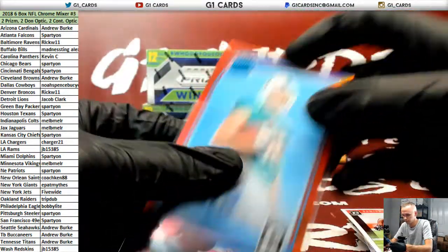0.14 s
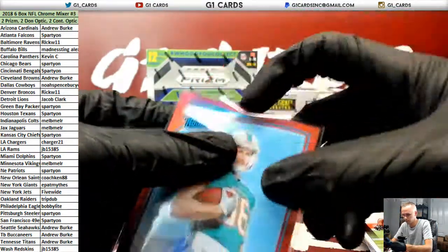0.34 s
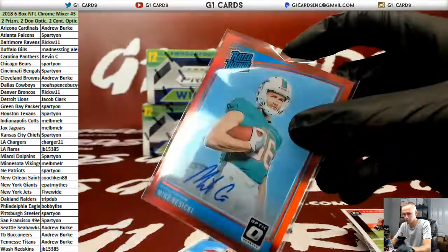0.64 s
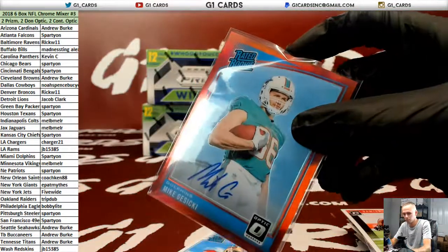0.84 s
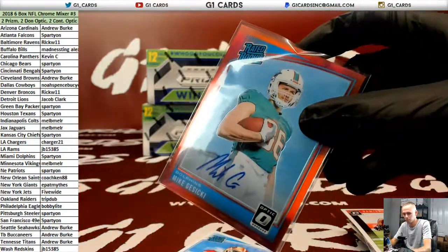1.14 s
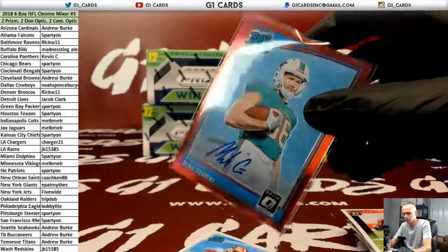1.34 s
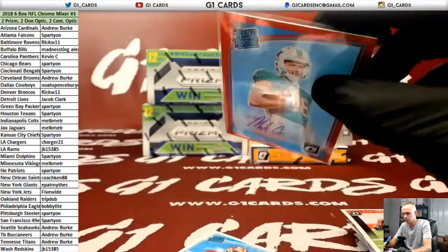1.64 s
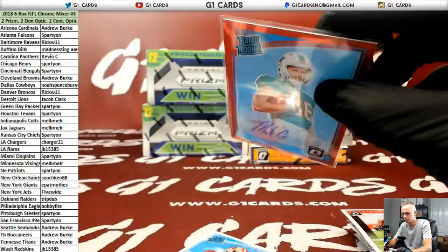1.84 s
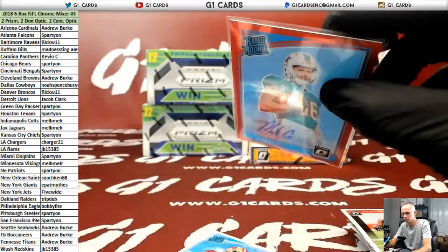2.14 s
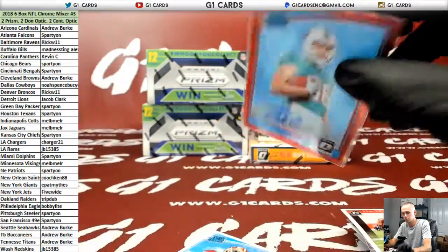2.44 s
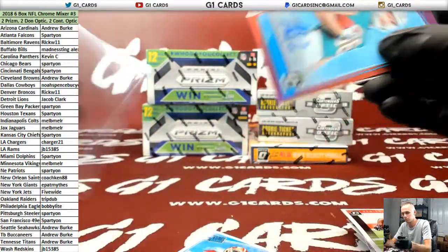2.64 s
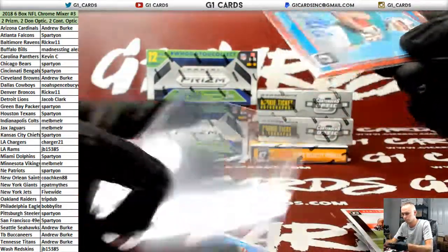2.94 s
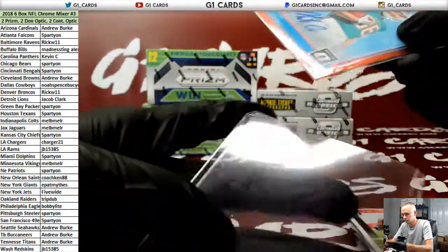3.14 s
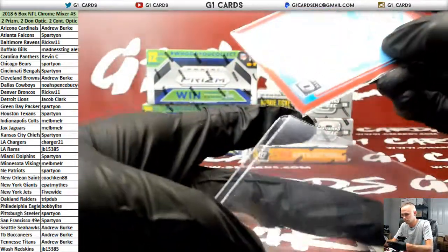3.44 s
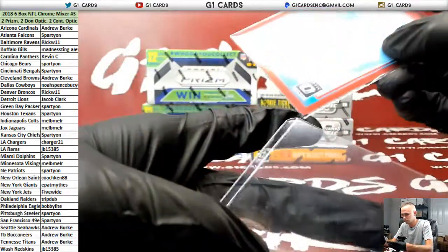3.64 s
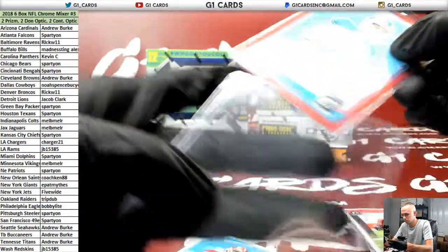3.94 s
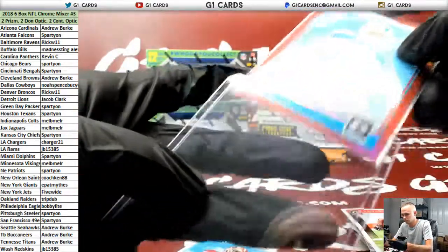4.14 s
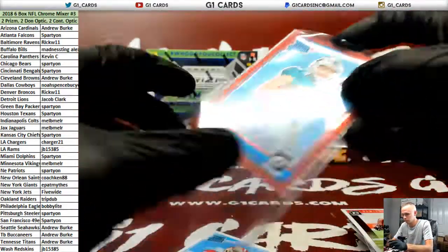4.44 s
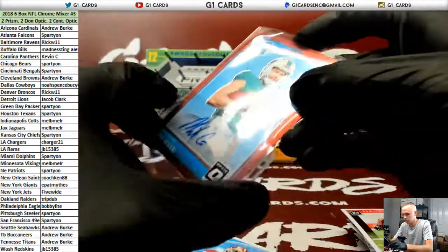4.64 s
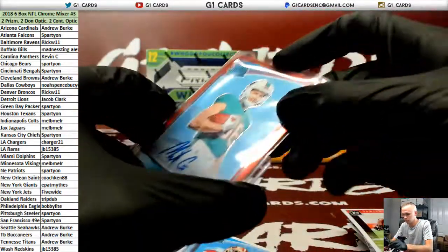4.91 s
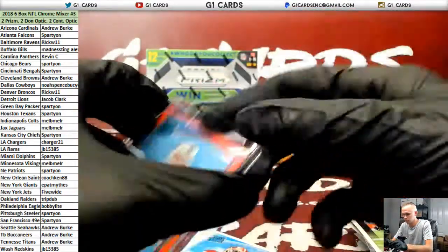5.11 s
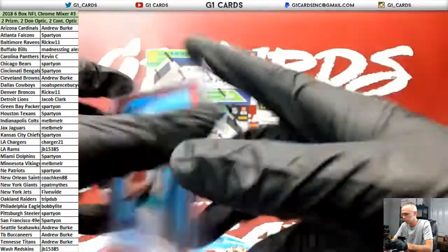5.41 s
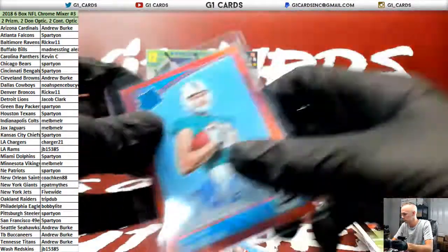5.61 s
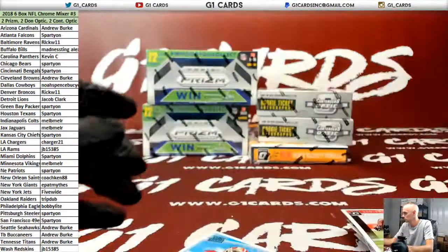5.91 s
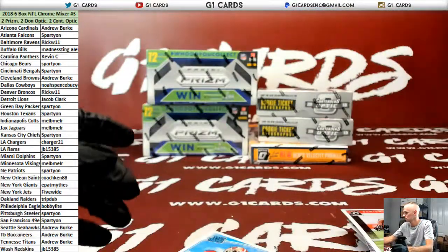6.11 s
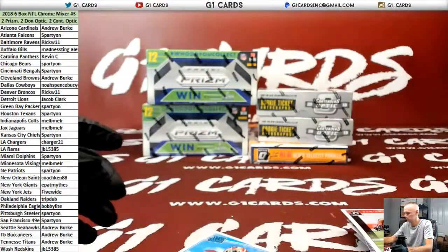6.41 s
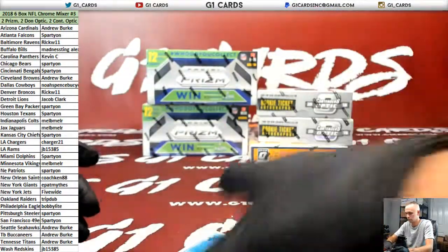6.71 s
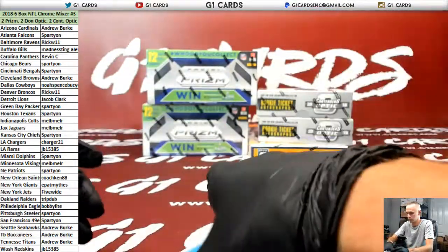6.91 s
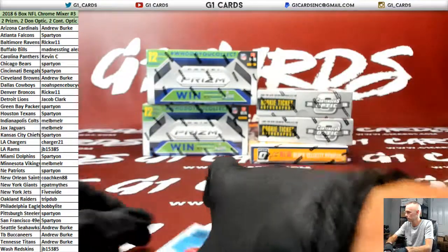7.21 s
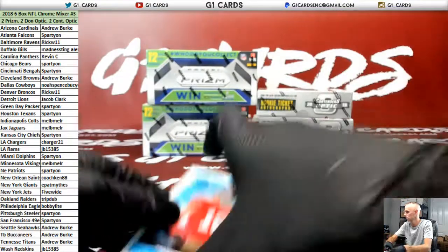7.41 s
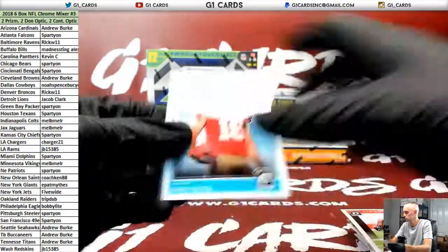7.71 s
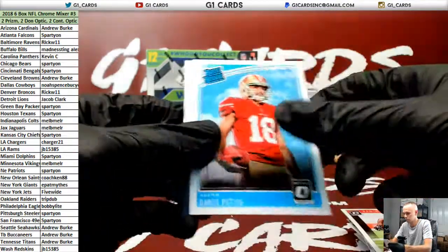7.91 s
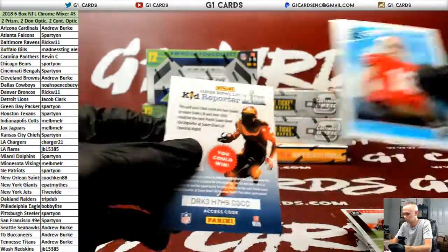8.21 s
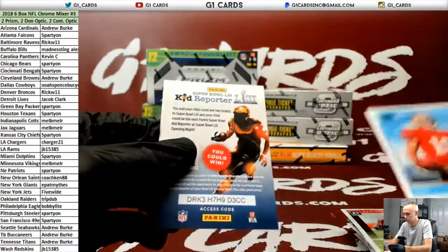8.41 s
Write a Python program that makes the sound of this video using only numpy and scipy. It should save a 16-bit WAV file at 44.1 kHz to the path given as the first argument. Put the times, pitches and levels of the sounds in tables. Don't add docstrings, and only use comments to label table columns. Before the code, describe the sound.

A low steady hum and faint air hiss underlie delicate handling noises: glove rubs, sleeve crinkles, crisp plastic clicks. After a card slides briefly into its holder with a gritty scrape, something flat smacks down loudly and the table rings. Quieter rubbing and small ticks resume before quick flicks and a second, snappier smack with a deep thump. Close indoor microphone, short reflections from near walls.

```python
import sys
import numpy as np
from scipy import signal
from scipy.fft import rfft, irfft, next_fast_len
from scipy.io import wavfile
from scipy.ndimage import map_coordinates

SR = 44100
rng = np.random.default_rng(int(sys.argv[2]) if len(sys.argv) > 2 else 0)


def makeup_ratio(level_db):
    decades = np.asarray(level_db, float) / 20
    return 10 ** decades


def generate_wav(signal):
    frames = np.transpose(np.atleast_2d(signal))
    scaled = np.clip(frames, -1, 1) * 32767
    pcm = np.round(scaled).astype(np.int16)
    wavfile.write(sys.argv[1], SR, pcm)


N = 377496
TIME = np.arange(N) / SR


def unit(x):
    return x / np.sqrt(np.mean(x ** 2) + 1e-20)


def along(points, hz):
    f, v = np.transpose(points)
    return np.interp(np.log(hz + 1), np.log(f + 1), v)


def filtered(x, response):
    m = next_fast_len(len(x) + 4096)
    gain = response(np.fft.rfftfreq(m, 1 / SR))
    return irfft(rfft(x, m) * gain, m)[:len(x)]


def hump(centre_hz, octaves):
    return lambda hz: np.exp(-2 * (np.log2((hz + 1) / centre_hz) / max(octaves, .1)) ** 2)


def noise(colour, size=N):
    return unit(filtered(rng.standard_normal(size), lambda hz: makeup_ratio(along(colour, hz))))


def wobble(rate):
    knots = rng.standard_normal(int(N / SR * 400))
    return map_coordinates(knots, [TIME * rate])


def friction(size, grit_db):
    strengths = np.minimum(rng.exponential(1, size // 24 + 1), 5)
    slips = np.repeat(strengths, 24)[:size]
    return unit(rng.standard_normal(size) * makeup_ratio(grit_db * slips))


def add(track, s, piece):
    part = track[max(round(s * SR), 0):][:len(piece)]
    part += piece[:len(part)]


# frequency_hz, level_db (per Hz)
AIR_COLOUR = [(100, -34.5), (170, -4), (258, -3), (306, -6), (384, -5.5), (653, -15), (955, -12),
              (1050, -16), (1200, -14.5), (2000, -23), (2330, -23), (5670, -42), (15800, -45)]
# frequency_hz, level_db (per Hz)
RUMBLE_COLOUR = [(5, -13.5), (14, 2), (26, 1), (48, -9), (70, -7), (95, -11.5), (150, -14.5), (185, -30)]
# pitch_hz, width_hz, level_db (rms)
DUCT_TONES = [(37.1, 12, -59), (117.3, 28, -62.5), (278, 50, -73), (381.2, 14, -73), (433, 40, -75),
              (772, 120, -77.5)]


def ventilation():
    hiss_db, rumble_db = -61 - 2.5, -55.5
    air = makeup_ratio(hiss_db) * noise(AIR_COLOUR)
    rumble_colour = RUMBLE_COLOUR + [(300, -120)]
    air = air + makeup_ratio(rumble_db + 1.6 * wobble(5)) * noise(rumble_colour)
    for pitch_hz, width_hz, level_db in DUCT_TONES:
        resonance = lambda hz: 1 / (1 + (2 * (hz - pitch_hz) / width_hz) ** 2)
        air = air + makeup_ratio(level_db) * unit(filtered(rng.standard_normal(N), resonance))
    return air


# frequency_hz, t60_s
WALL_DECAY = [(100, .26), (500, .24), (1300, .25), (2500, .21), (6000, .22), (12000, .17)]


def room(x):
    stretch_s, build_up_s = .37, .0023
    out, step = np.zeros(N), round(stretch_s * SR)
    for start in range(0, N, step):
        hz, t, z = signal.stft(rng.standard_normal(SR // 2), SR, nperseg=256)
        fall_db = -60 * t / along(WALL_DECAY, hz)[:, None]
        fade = makeup_ratio(fall_db) + makeup_ratio(-16 + .45 * fall_db)
        tail = signal.istft(z * fade, SR, nperseg=256)[1]
        tail *= np.clip(np.arange(len(tail)) / SR / build_up_s, 0, 1)
        tail = tail / np.linalg.norm(tail)
        add(out, start / SR, signal.fftconvolve(x[start:start + step], tail))
    return out


# time_s, rustle_db
HAND_ACTIVITY = [(0.0, -81), (0.49, -76), (0.77, -82), (1.75, -80), (1.9, -77), (2.46, -74), (3.13, -83),
                 (3.79, -83), (4.35, -74), (4.52, -79), (5.29, -80), (5.4, -75), (6.06, -78), (6.2, -76),
                 (7.07, -80), (7.25, -75), (7.81, -82), (8.4, -78)]


def hands():
    s, db = np.transpose(HAND_ACTIVITY)
    mean_db = db.mean()
    busy_db = np.interp(TIME, s, db - mean_db) + 1.3 * wobble(30) + 1.2 * wobble(150)
    gloves = (0, 1, hump(6200, 1.15))
    holder = (-.5, .9, hump(3100, .95))
    sleeve = (-7, .6, hump(12500, .69))
    out = np.zeros(N)
    for over_db, grows, colour in (gloves, holder, sleeve):
        rustle = unit(filtered(friction(N, grit_db=2.0), colour))
        out += makeup_ratio(mean_db + over_db + grows * busy_db + 1.1 * wobble(25)) * rustle
    return out


# start_s, level_db (rms), length_s, centre_hz
GLOVE_RUBS = [(.05, -72, .125, 12000), (.491, -76, .15, 5900), (2.05, -70.5, .065, 7400),
              (2.203, -58.5, .045, 5000), (2.528, -65, .03, 7500), (2.53, -65.5, .125, 3800),
              (3.79, -76, .17, 10000), (3.906, -77, .05, 6000), (4.069, -70, .135, 8500),
              (4.293, -73, .045, 8000), (4.41, -70, .077, 6000), (4.78, -76, .02, 7000),
              (4.92, -67, .18, 6500), (5.396, -63, .018, 8900), (5.45, -68, .04, 7000),
              (1.72, -75, .1, 6500), (.695, -74, .02, 5000), (2.995, -73, .03, 5000),
              (5.569, -72, .05, 6960), (6.738, -68.5, .06, 6000), (7.25, -62, .075, 5500),
              (7.32, -68, .095, 4500), (7.03, -75, .06, 7000), (7.13, -73, .1, 6500), (7.5, -78, .1, 6500),
              (5.33, -68, .05, 5500), (8.001, -72, .08, 6000), (8.17, -74, .16, 5500)]
# start_s, level_db (rms), length_s, centre_hz
THUMB_FLICKS = [(.313, -64, .016, 8000), (1.95, -65.5, .013, 9000), (2.579, -57, .014, 3800),
                (5.309, -53, .022, 4500), (5.333, -63, .008, 8000), (6.107, -62, .022, 1200),
                (6.113, -63, .02, 6500), (6.133, -58, .012, 6500), (6.135, -58, .012, 1800),
                (8.085, -64, .02, 4900), (8.432, -55, .008, 1500), (8.449, -45, .009, 2000)]
# start_s, level_db (rms), length_s, centre_hz
EDGE_SCRAPES = [
    (2.085, -69, .016, 2500),
    (2.19, -72, .03, 2600),
    (3.942, -66, .014, 900),
    (4.29, -68, .047, 3100),
    (4.92, -69, .14, 3100),
    (6.75, -72, .05, 2400),
    (7.34, -69, .04, 1900),
    (8.02, -68, .02, 1900),
]


def rubs():
    out, t = np.zeros(N), np.arange(SR // 3) / SR
    kinds = [(GLOVE_RUBS, 1.7, .35), (THUMB_FLICKS, 1.9, .22), (EDGE_SCRAPES, .6, .3)]
    fingertip = hump(6500, .6)
    for rows, octaves, grip in kinds:
        for s, db, length, centre_hz in rows:
            stroke = np.clip(t / (grip * length), 0, 1) * makeup_ratio(-1500 * np.clip(t - length, 0, 1))
            bends_db = 1.8 * rng.standard_normal(40)
            bends_hz = np.linspace(0, SR / 2, 40)

            def colour(hz):
                touch = hump(centre_hz, octaves)(hz) * (1 + .3 * fingertip(hz))
                return touch * makeup_ratio(np.interp(hz, bends_hz, bends_db))

            rub = unit(filtered(friction(len(t), grit_db=2.2), colour))
            add(out, s, makeup_ratio(db) * stroke * rub)
    return out * makeup_ratio(1.8 * wobble(70))


# time_s, level_db, gap_closed (0-1)
CARD_SLIDE = [
    (4.9, -85, .1),
    (4.94, -70, .3),
    (4.985, -67, .3),
    (5.003, -57, .7),
    (5.018, -61, .9),
    (5.03, -56, .9),
    (5.06, -62, .9),
    (5.08, -73, .9),
    (5.12, -90, .9),
]


def slide():
    s, db, closed = np.transpose(CARD_SLIDE)
    closed = np.clip(np.interp(TIME, s, closed), 0, 1)
    scrape = friction(N, grit_db=2) * makeup_ratio(2.5 * wobble(120))
    low = unit(filtered(scrape, hump(1600, .35)))
    high = unit(filtered(scrape, hump(2050, .35)))
    level = makeup_ratio(np.interp(TIME, s, db, -120, -120))
    return level * (np.sqrt(1 - closed) * low + np.sqrt(closed) * high)


# start_s, peak_db, centre_hz, film_db, body_db
HOLDER_SNAPS = [
    (.1778, -31, 8000, -16, -8),
    (.3255, -39, 5500, -5, -9),
    (1.4029, -32, 7500, -7, -10),
    (5.3144, -35, 3480, -20, -10),
]
# start_s, peak_db
SLEEVE_CREASES = [(.017, -63), (.194, -49), (.392, -53), (.691, -54), (.707, -56), (1.901, -56),
                  (2.294, -52), (2.303, -56), (2.494, -59), (2.785, -55), (3.01, -54), (3.943, -55),
                  (4.158, -54), (4.37, -56), (4.632, -58), (5.102, -54), (5.232, -54), (5.238, -54),
                  (5.4056, -50), (5.433, -51), (5.62, -60), (6.7177, -53), (6.9, -59), (7.525, -58),
                  (7.56, -58), (8.093, -49.5)]
# start_s, peak_db, centre_hz
EDGE_CATCHES = [(1.03, -58, 4000), (2.157, -62, 5000), (2.5875, -42, 3500), (2.6595, -40, 3000),
                (4.275, -57, 3000), (4.335, -39, 4200), (4.435, -51, 4000), (4.45, -56, 3200),
                (4.515, -43, 4000), (5.308, -43, 2580), (5.545, -51.5, 3000), (5.5666, -49, 5000),
                (6.6747, -52, 4500), (7.09, -57, 4000), (8.03, -56, 3000), (8.06, -57, 4000),
                (8.454, -30, 3500)]
# start_s, peak_db, centre_hz
DULL_TAPS = [
    (1.4025, -42, 900),
    (5.314, -45, 1000),
    (3.9435, -45, 1000),
    (4.135, -53, 950),
    (5.668, -63, 1500),
    (6.1062, -34, 1700),
    (8.43, -34, 1900),
    (8.4325, -36, 900),
    (8.453, -32, 2100),
]
# start_s, peak_db, pitch_hz
FILM_PINGS = [(2.64, -57, 2800), (3.803, -60, 5170), (3.82, -61, 9500), (3.915, -60, 6200),
              (4.085, -59, 8000), (4.097, -60, 7800), (4.14, -56, 8600), (4.157, -57, 5400),
              (4.158, -58, 11700), (4.19, -62, 6500), (4.265, -62, 7700), (4.39, -60, 5000),
              (4.435, -57, 6300), (5.308, -48, 2500)]


def ticks():
    out, t = np.zeros(N), np.arange(-100, 300) / SR
    # start_s, peak_db, centre_hz, breadth in octaves
    rows = [(s, db, 7200, 1.6) for s, db in SLEEVE_CREASES]
    rows += [(*row, 1.5) for row in EDGE_CATCHES]
    rows += [(*row, 1.9) for row in DULL_TAPS]
    rows += [(*row, .16) for row in FILM_PINGS]
    for s, db, hz, film_db, body_db in HOLDER_SNAPS:
        rows += [(s, db, hz, 3.1), (s, db + film_db, 7650, .4), (s, db + body_db, 2500, 2.1)]
    for s, db, hz, octaves in rows:
        rattle = makeup_ratio(-15 - 60 * t / .008) * rng.standard_normal(len(t)) * (t > 0)
        snap = filtered((t == 0) + rattle, hump(hz, octaves))
        add(out, s + t[0] + .0005, makeup_ratio(db) * snap / np.abs(snap).max())
    return out


# start_s, pitch_hz, level_db, t60_s
DESK_MODES = [
    (6.158, 291, -32.5, .17),
    (6.158, 425, -38.5, .15),
    (6.158, 240, -38, .2),
    (6.158, 80, -41.5, 0.23),
    (8.468, 90, -26.5, 0.13),
    (8.466, 199, -36.5, 0.13),
    (8.464, 310, -41.5, 0.083),
]


def desk():
    out, t = np.zeros(N), np.arange(SR // 2) / SR
    for s, hz, db, t60 in DESK_MODES:
        soft_start = 1 - np.exp(-t / .0013)
        add(out, s, makeup_ratio(db - 60 * t / t60) * np.sin(2 * np.pi * hz * t) * soft_start)
    return out


# start_s, hiss_db (rms at the start), t60_s, puff_db (energy)
AIR_CRACKS = [
    (6.1486, -27, .03, 0),
    (8.4607, -21, .014, -4),
]
# frequency_hz, level_db (per Hz)
AIR_CRACK_COLOURS = [
    [(170, -17), (300, -1), (450, -3), (750, -19), (1270, -4), (3000, -7.5), (3900, -14), (6000, -14), (9000, -23), (13200, -30), (15700, -39), (16500, -60)],
    [(150, -36), (250, -9), (700, -17), (1000, -6), (2000, -5), (3000, -6), (4000, -3), (6000, -5), (8320, -9), (10000, -15), (15100, -20), (16500, -38)],
]


def cracks():
    hiss, puff, t = np.zeros(N), np.zeros(N), np.arange(SR // 20) / SR
    lead = 300
    for (s, db, t60, puff_db), colour in zip(AIR_CRACKS, AIR_CRACK_COLOURS):
        burst = makeup_ratio(db - 60 * t / t60) * (1 - np.exp(-t / .0006))
        add(hiss, s, burst * noise(colour, size=len(t)))
        click = 1.0 * (np.arange(len(t)) == lead)
        pulse = filtered(click, lambda hz: makeup_ratio(along(colour, hz)))
        add(puff, s - lead / SR, makeup_ratio(puff_db) * pulse / np.linalg.norm(pulse))
    return hiss, puff


# centre_s, peak_db, pitch_hz, cycles, sign (with a slight gain)
SLAP_EDGES = [
    (6.1494, -11, 2370, 3.1, 0.97),
    (6.149, -13, 6340, 5, 0.98),
    (6.1515, -19, 5400, 6, 1),
    (6.1561, -6.5, 1500, 1.57, -1.03),
    (6.1575, -18, 390, 1.52, -0.88),
    (8.4621, -11, 3600, 4.5, 1),
    (8.4613, -17, 7200, 8, 0.95),
    (8.4612, -21, 1210, 1.5, -1.23),
    (8.465, -16.5, 1020, 1.3, 0.84),
]


def slaps():
    out, t = np.zeros(N), np.arange(-300, 300) / SR
    for s, db, hz, cycles, sign in SLAP_EDGES:
        swell = np.exp(-(2.91 * t * hz / cycles) ** 2)
        add(out, s + t[0], sign * makeup_ratio(db) * np.cos(2 * np.pi * hz * t) * swell)
    return out


def scene():
    snaps = ticks()
    strokes = rubs() + slide()
    blows = slaps()
    hiss, puff = cracks()
    echoes = room(makeup_ratio(-5.5) * snaps + makeup_ratio(-8) * strokes + makeup_ratio(-16) * blows + puff)
    quiet = filtered(snaps + strokes + hands() + ventilation(), lambda hz: hz < 15830)
    return (quiet + blows + hiss + echoes + desk())[None]


def band_limit(x):
    return signal.sosfilt(signal.butter(12, 16620, fs=SR, output="sos"), x)


def record(dry):
    top_hz = 16600
    mix = filtered(dry[0], lambda hz: hz < top_hz)[None]
    return band_limit(mix)


dry = scene()
out = record(dry)
generate_wav(out)
```